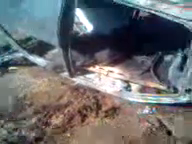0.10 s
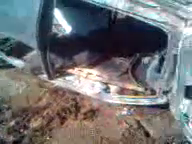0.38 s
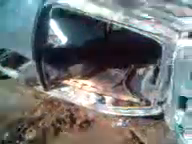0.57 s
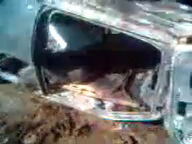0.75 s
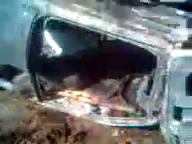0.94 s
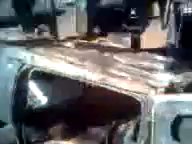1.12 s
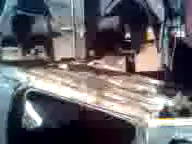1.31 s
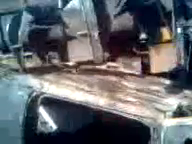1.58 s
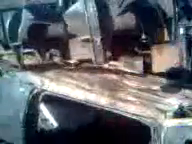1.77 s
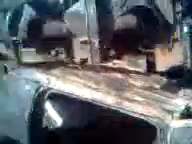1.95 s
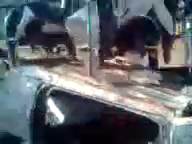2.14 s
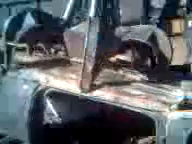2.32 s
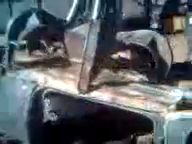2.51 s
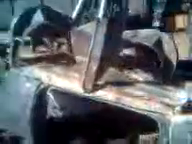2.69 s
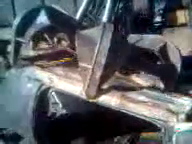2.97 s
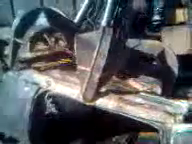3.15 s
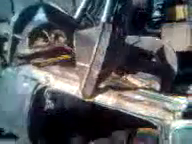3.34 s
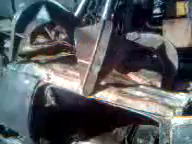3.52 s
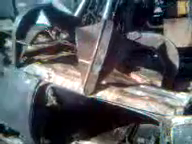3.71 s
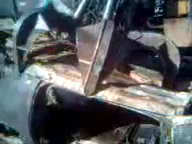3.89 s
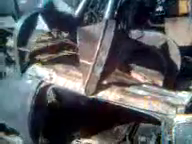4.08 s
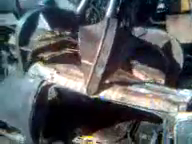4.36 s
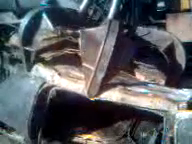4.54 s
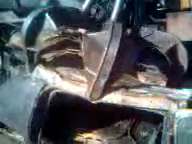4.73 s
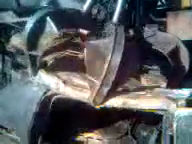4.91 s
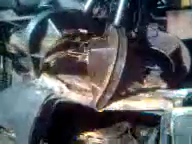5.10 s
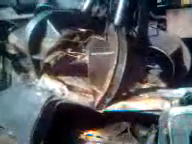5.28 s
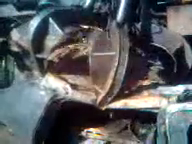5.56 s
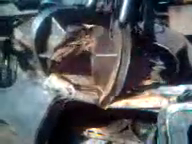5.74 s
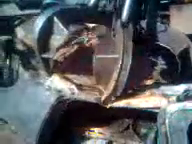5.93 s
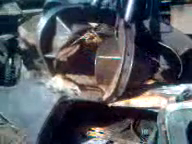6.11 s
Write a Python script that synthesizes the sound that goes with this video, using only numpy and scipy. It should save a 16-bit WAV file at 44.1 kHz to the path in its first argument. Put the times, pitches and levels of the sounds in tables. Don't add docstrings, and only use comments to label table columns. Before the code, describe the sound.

A diesel machine drones steadily outdoors while its hydraulic claw crushes car bodies in bursts of loud, sharp metallic cracks, crunches and grinding.

```python
import sys
import numpy as np
from scipy import signal
from scipy.fft import rfft, irfft, next_fast_len
from scipy.io import wavfile
from scipy.ndimage import uniform_filter1d, map_coordinates

SR = 44100
rng = np.random.default_rng(int(sys.argv[2]) if len(sys.argv) > 2 else 0)


def attenuation_scalar(level_db):
    decades = np.asarray(level_db, float) / 20
    return 10 ** decades


def file_out(sig):
    cols = np.atleast_2d(sig).T
    lim = np.clip(cols, -1, 1)
    pcm = np.round(lim * 32767).astype(np.int16)
    wavfile.write(sys.argv[1], SR, pcm)


N = 271656


def unit(x):
    return x / np.sqrt(np.mean(x ** 2, axis=-1, keepdims=True) + 1e-20)


def along(points, hz):
    f, v = np.transpose(points)
    return np.interp(np.log(hz + 1), np.log(f + 1), v)


def curves(rows):
    s, *columns = np.transpose(rows)
    return [np.interp(np.arange(N) / SR, s, column) for column in columns]


def wobble(rate):
    at = np.arange(0, N + 16, 16)
    knots = rng.standard_normal(int(N * 400 / SR) + 4)
    coarse = map_coordinates(knots, [at * min(rate, 400) / SR])
    return np.interp(np.arange(N), at, coarse)


def filtered(x, response):
    n = x.shape[-1]
    m = next_fast_len(n + 4096)
    return irfft(rfft(x, m) * response(np.fft.rfftfreq(m, 1 / SR)), m)[..., :n]


def resonance(centre_hz, width_hz):
    return lambda f: 1j * f * width_hz / (centre_hz ** 2 - f * f + 1j * f * width_hz)


def patchy(depth_db):
    z = signal.stft(rng.standard_normal(N + 512), nperseg=256)[2]
    field = uniform_filter1d(rng.standard_normal(z.shape), size=2, axis=0)
    field = uniform_filter1d(field, size=8, axis=1)
    return signal.istft(z * attenuation_scalar(depth_db * field / field.std()), nperseg=256)[1][:N]


def swells(rows):
    t = np.arange(0, N / SR + .002, .002)
    gain = sum(attenuation_scalar(db - 20 * np.abs(t - s) / max(fall_s, .02)) for s, db, fall_s in rows)
    return np.interp(np.arange(N) / SR, t, gain)


# t/s, third firing order f/Hz
FIRING_SPEED = [(0, 232), (.25, 230.5), (.6, 230.5), (.7, 233.2), (3.55, 233.2), (3.72, 245.5),
                (4.1, 246.8), (6.16, 246.5)]


def drone_rotation():
    drone_hz, = curves(FIRING_SPEED)
    return drone_hz, 2 * np.pi * np.cumsum(drone_hz) / SR


def boom_shade():
    t = np.arange(N) / SR
    from_s, to_s, edge_s = 0.23, .64, .06
    return -10.5 * np.clip(np.minimum(t - from_s, to_s - t) / edge_s, 0, 1)


def firing_beats(turn):
    cycle = turn / 12
    return 1 + 0.083 * np.cos(4 * cycle) + 0.068 * np.cos(3 * cycle) + 0.071 * np.cos(cycle)


# f/Hz, level/dB
RUMBLE_SPECTRUM = [(20, -31.5), (50, -14), (110, -12), (160, -2.5), (210, -2.5), (300, -2), (400, -8),
                   (500, -13.5), (620, -21)]
# t/s, peak level/dB, time to fall 20 dB/s
GROUND_THUDS = [(1.6, -36.5, 0.37), (2.26, -24, 0.14), (2.88, -27, 0.74), (3.6, -26, -0.06),
                (3.88, -29, 0.48), (4.6, -22, 0.29), (6.0, -28, 0.62)]


def rumble(firing, effort_db):
    noise = unit(filtered(firing * patchy(depth_db=2.0), lambda hz: attenuation_scalar(along(RUMBLE_SPECTRUM, hz))))
    shake = attenuation_scalar(-37 + 0.32 * effort_db) + swells(GROUND_THUDS)
    return shake * noise


# f/Hz, level/dB
ROAR_SPECTRUM = [(280, -37), (480, -13.5), (584, -12), (667, -10.5), (895, -3.5), (1020, -6.5), (1180, -6),
                 (1510, -9.5), (1870, -4), (2200, -11), (4030, -21.5), (5240, -56), (8870, -120)]


def roar(firing, roar_db):
    noise = unit(filtered(firing * patchy(depth_db=1.5), lambda hz: attenuation_scalar(along(ROAR_SPECTRUM, hz))))
    return attenuation_scalar(roar_db - 2.0) * noise


def fan(turn, shade_db):
    return attenuation_scalar(-38 + shade_db + 2.0 * wobble(7.1)) * np.sin(1.545 * turn + 0.59 * wobble(20))


# multiple of the drone, level/dB
MACHINE_TONES = [(.5, -51.5), (.667, -55.5), (0.834, -54.5), (1.23, -48), (1.333, -43), (1.917, -50)]


def machine_tones(drone_hz, turn, effort_db, shade_db):
    tones = 0
    for k, db in MACHINE_TONES:
        level_db = db + 0.42 * effort_db + shade_db * (k > 1.3) + 2.38 * wobble(5)
        tones = tones + attenuation_scalar(level_db) * np.sin(k * turn + .4 * wobble(16))
    loaded = np.clip((drone_hz - 238) / 6, 0, 1)
    pump = loaded * attenuation_scalar(-47 + 3 * wobble(6)) * np.sin(1.834 * turn)
    return 1.22 * (tones + pump)


# t/s, level/dB
DRONE_LEVEL = [(0.0, -38), (0.1, -32), (0.2, -44.5), (0.31, -29.5), (0.56, -28.5), (0.67, -41), (0.79, -29),
               (1.13, -30), (1.27, -37), (1.61, -25.5), (2.06, -27.5), (2.62, -23.5), (3.07, -44),
               (3.29, -26.5), (4.32, -31), (6.06, -30.5), (6.07, -38.5), (6.16, -30.5)]


def drone(turn):
    drone_db, = curves(DRONE_LEVEL)
    return attenuation_scalar(drone_db + 2.0 + 1.4 * wobble(30)) * np.sin(turn + 0.099 * wobble(40))


# t/s, roar level/dB
ENGINE_LOAD = [(0.0, -33.5), (0.46, -34), (1.27, -34.5), (1.47, -30.5), (2.01, -34), (2.26, -22),
               (2.45, -31), (2.91, -30), (3.21, -31), (3.5, -31.5), (3.77, -27.5), (4.24, -28), (4.43, -28),
               (4.75, -24.5), (4.89, -27), (5.18, -30), (5.83, -28.5), (6.16, -27.5)]


def engine():
    drone_hz, turn = drone_rotation()
    roar_db, = curves(ENGINE_LOAD)
    effort_db = roar_db - roar_db[0]
    shade_db = boom_shade()
    firing = firing_beats(turn)
    tonal = drone(turn) + fan(turn, shade_db) + machine_tones(drone_hz, turn, effort_db, shade_db)
    return tonal + roar(firing, roar_db) + rumble(firing, effort_db)


# f/Hz, bandwidth/Hz
GRIND_BANDS = [
    (800, 1000),
    (2100, 840),
    (3400, 1800),
]
# t/s, peak level/dB, time to fall 20 dB/s
BOOMING = [(1.47, -25, 0.42), (2.138, -21, 0.18), (2.41, -27.5, 0.4), (2.72, -29, -0.17),
           (2.98, -25.5, 0.77), (3.56, -21, 0.21), (4.0, -22, 0.08), (4.79, -22.5, 0.2), (5.62, -31, 0.4)]
CRUNCHING = [(1.47, -25, 0.2), (2.02, -24, 0.16), (2.29, -17.5, 0.17), (2.7, -23, .17), (3.729, -29, .5),
             (4.0, -23.5, .3), (4.61, -25, .4), (4.879, -29, .2), (5.4, -32, .4), (6.1, -33, 0.52)]
TEARING = [(1.49, -35.5, 0.37), (2.17, -14.5, .08), (2.35, -34.5, 0.19), (2.699, -20, 0.18),
           (3.44, -31.5, .3), (3.729, -30.5, 0.18), (4.44, -30.5, 0.37), (5.4, -27, 0.16),
           (6.039, -32.5, 0.26)]


def grind():
    clumps = 1.5 * wobble(45)
    out = 0
    for (hz, width), squeezes in zip(GRIND_BANDS, (BOOMING, CRUNCHING, TEARING)):
        grains = patchy(depth_db=3) * attenuation_scalar(clumps + 2 * wobble(200))
        ring = resonance(hz, width)
        out = out + attenuation_scalar(-6.0) * swells(squeezes) * unit(filtered(grains, lambda f: ring(f) ** 2))
    return out


# t/s, peak level/dB
HARD_TICKS = [(2.179, -0.7), (2.213, -3), (2.245, -3), (2.347, -3.5), (3.153, -2), (4.637, -4),
              (4.138, -2.5), (4.757, -1.5), (5.902, -2.5), (5.933, -6), (6.081, -6)]


def hard_ticks():
    t = np.arange(SR // 4) / SR
    tick_hz, t60_s = 1900, .008
    tick = np.sin(2 * np.pi * tick_hz * t) * attenuation_scalar(-60 * t / t60_s)
    out = np.zeros(N + len(t))
    for at, db in HARD_TICKS:
        out[round((at - .0003) * SR):][:len(t)] += attenuation_scalar(db) * tick
    return out[:N]


# low mode against high/dB, broad snap level/dB, rise/s, t60 of a full blow/s
SNAP, BUCKLE = (-17.5, -3, 0.0011, 0.097), (-6, -3, .0015, .11)
GROAN, KNOCK = (-13.5, -7, .008, .15), (3, -8, 0.0026, .1)
# t/s, peak level/dB, low panel f/Hz, high panel f/Hz
SEAM_SNAPS = [(1.407, -12.5, 950, 2300), (1.477, -0.5, 842, 2300), (1.505, -9, 1290, 1320),
              (2.231, 0, 875, 2390), (2.98, -2.5, 937, 2424), (2.992, -2.5, 438, 2225),
              (3.152, 1.5, 288, 2382), (4.125, -6, 877, 1600), (4.141, 1.5, 682, 1102),
              (4.357, -6.5, 760, 3350), (4.379, -4, 388, 3450), (4.42, -9, 446, 3100),
              (4.531, -6.5, 314, 1830), (4.72, -3.5, 432, 2336), (4.749, 5.5, 910, 2218),
              (4.861, 2, 727, 1733), (5.128, -5.5, 870, 1473), (5.28, -16.5, 1900, 3520),
              (5.59, -16, 1700, 3370), (5.902, -3.5, 885, 2080), (6.03, -1.2, 715, 1893),
              (6.06, -7, 875, 1868), (6.076, -0.5, 910, 3340), (6.084, -8, 937, 1924)]
# t/s, peak level/dB, low panel f/Hz, high panel f/Hz
PANEL_BUCKLES = [(1.391, -9, 867, 2240), (1.499, -8, 720, 2300), (2.105, -8, 439, 1882),
                 (2.127, 3.5, 665, 1873), (2.164, -4.5, 667, 1044), (2.175, -2.5, 914, 1773),
                 (2.199, -6.5, 1014, 2465), (2.212, -0.8, 688, 2280), (2.242, -3, 812, 1860),
                 (2.258, -10, 940, 1825), (2.439, -9.5, 280, 1580), (3.164, -8, 810, 2214),
                 (4.131, 4, 749, 1280), (4.179, -8, 304, 1860), (4.59, -4.5, 364, 1705),
                 (4.619, 0.5, 568, 1083), (4.632, 1.5, 675, 1883), (4.649, -5.5, 983, 1042),
                 (4.833, -3, 1103, 1037), (4.873, -2, 586, 1910), (4.901, -11.5, 1000, 1250),
                 (5.387, 1.5, 777, 1276), (5.395, 2, 719, 1954), (5.406, -3, 752, 2250),
                 (5.931, -7, 712, 2420)]
# t/s, peak level/dB, low panel f/Hz, high panel f/Hz
FOLD_GROANS = [(1.367, -14.5, 903, 2296), (1.93, -18, 700, 2310), (2.034, -10.5, 668, 2414),
               (2.343, -5, 370, 2500), (2.395, -8, 1074, 1794), (2.675, -10, 295, 3330),
               (2.735, -9, 1700, 800), (2.765, -4, 898, 2293), (3.51, -15, 295, 2540),
               (3.541, -11.5, 975, 1030), (3.57, -12, 321, 1287), (3.64, -7, 265, 2020),
               (3.745, -14, 875, 2620), (3.769, -13.5, 875, 1264), (3.929, -10, 265, 3290),
               (3.95, -7, 268, 2105), (3.99, -12, 700, 2180), (5.439, -10.5, 865, 1916)]
# t/s, peak level/dB, low panel f/Hz
SHELL_KNOCKS = [(1.688, -21, 353), (2.297, -12.5, 444), (2.579, -20, 349), (2.617, -21, 313),
                (2.809, -13, 346), (2.91, -8, 930), (3.189, -18, 864), (3.455, -21.5, 362),
                (3.609, -13.5, 316), (3.858, -19, 320), (3.988, -12.5, 333), (4.994, -16, 293),
                (5.058, -15.5, 309), (5.33, -16, 277), (5.586, -6.5, 302), (5.736, -22, 318),
                (5.788, -20, 1044), (5.823, -16.5, 277), (5.878, -14.5, 287)]


def cracks():
    blows = [row + SNAP for row in SEAM_SNAPS]
    blows += [row + BUCKLE for row in PANEL_BUCKLES]
    blows += [row + GROAN for row in FOLD_GROANS]
    blows += [(*row, 1700, *KNOCK) for row in SHELL_KNOCKS]
    s, peak_db, low_hz, high_hz, low_db, snap_db, rise, t60 = np.transpose(blows)[..., None]
    t = np.arange(SR // 4) / SR
    tear = rng.standard_normal((len(s), 4 * len(t))).reshape(len(s), 4, -1)
    rattle = attenuation_scalar(14 * uniform_filter1d(tear[:, 3], size=120, axis=1))
    t60 = np.clip(t60 - .004 * peak_db, .02, 1)
    rise = np.abs(rise) + 0.0004 * np.clip(-peak_db - 11.0, 0, 20)
    decay = attenuation_scalar(-60 * t / t60) + 0.1 * attenuation_scalar(-60 * t / (3 * t60))
    fall = (1 - np.exp(-t / rise)) * decay * rattle

    def panel(hz, spread, sharp_hz):
        return lambda f: resonance(hz, spread * hz)(f) * (1 + 0.84 * resonance(hz, sharp_hz)(f))

    high = unit(filtered(tear[:, 0] * fall, panel(high_hz, spread=0.15, sharp_hz=51)))
    low = unit(filtered(tear[:, 1] * fall, panel(low_hz, spread=0.3, sharp_hz=70))) * attenuation_scalar(low_db + 8.5)
    snap = unit(filtered(tear[:, 2] * fall, resonance(1500, 3000))) * attenuation_scalar(snap_db)
    rows = high + low + snap
    rows = rows * attenuation_scalar(peak_db - 1.5) / np.abs(rows).max(axis=1, keepdims=True)
    out = np.zeros(N + len(t))
    for at, row in zip(s[:, 0], rows):
        out[round((at - .002) * SR):][:len(t)] += row
    return out[:N]


def scene():
    machine = engine() + grind()
    steel = cracks() + hard_ticks()
    ground = attenuation_scalar(-22.5) * np.roll(steel, round(0.016 * SR))
    wrecks = attenuation_scalar(-22.0) * np.roll(steel, round(0.047 * SR))
    return (machine + steel + ground + wrecks)[None]


def roll_off(x):
    return signal.sosfilt(signal.butter(12, 15900, fs=SR, output="sos"), x)


# f/Hz, level/dB
PHONE_BAND = [(20, -2.5), (100, 2), (3500, 0), (3900, -12.5), (4200, -18), (4500, -34), (4800, -70.5),
              (5100, -120), (20000, -120)]


def record(dry):
    x = dry / (1 + np.abs(dry / .95) ** 4) ** (1 / 4)
    x = filtered(x, lambda hz: attenuation_scalar(along(PHONE_BAND, hz)))
    top = filtered(x, lambda hz: np.clip((hz - 3500) / 400, 0, 1))
    x = x + (attenuation_scalar(2.9 * wobble(70) - 0.5) - 1) * top
    clip = .72
    x = x / (1 + np.abs(x / clip) ** 30) ** (1 / 30)
    return roll_off(x)


dry = scene()
out = record(dry)
file_out(out)
```